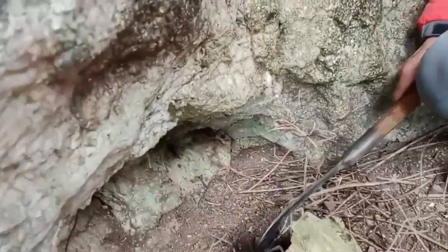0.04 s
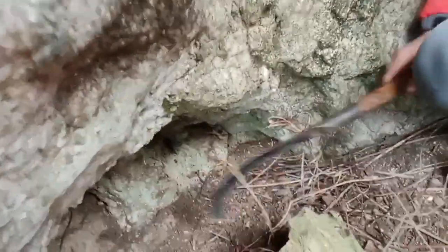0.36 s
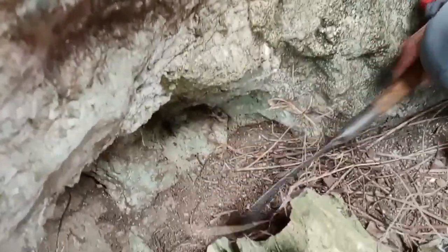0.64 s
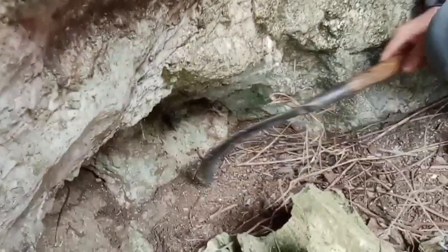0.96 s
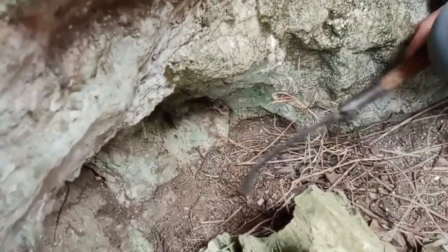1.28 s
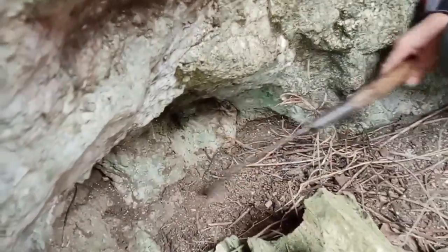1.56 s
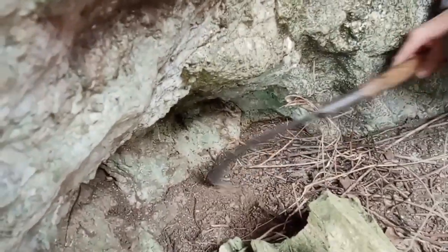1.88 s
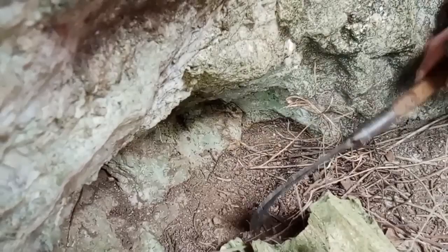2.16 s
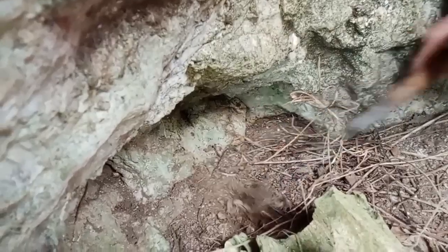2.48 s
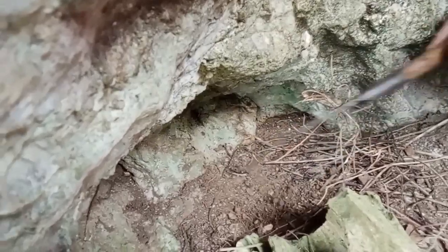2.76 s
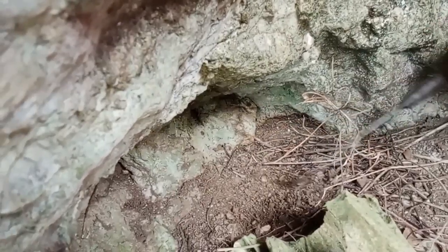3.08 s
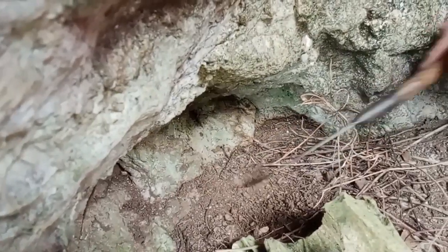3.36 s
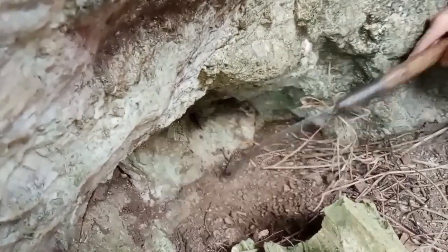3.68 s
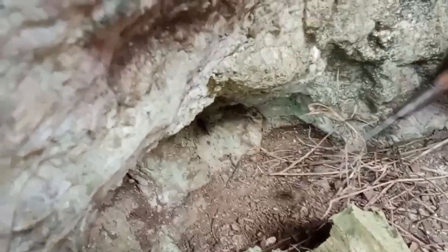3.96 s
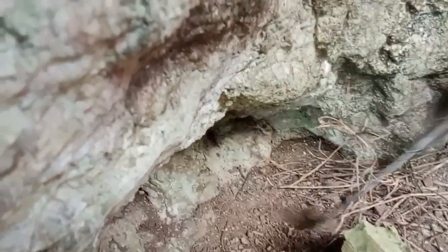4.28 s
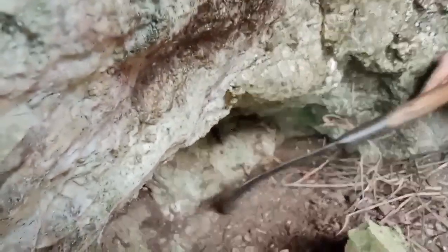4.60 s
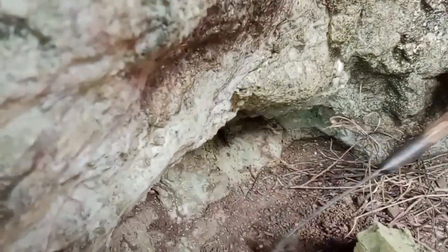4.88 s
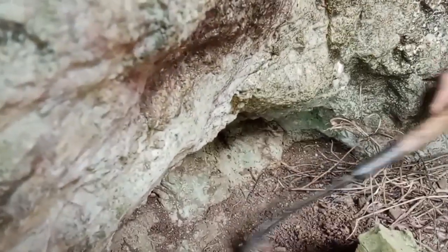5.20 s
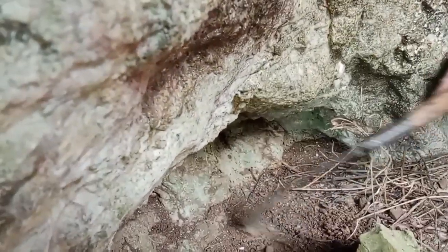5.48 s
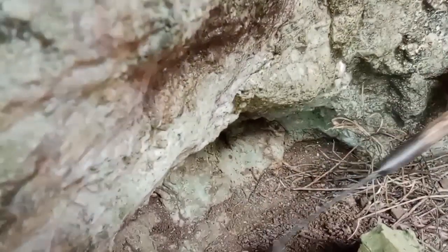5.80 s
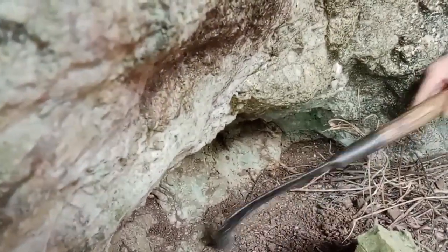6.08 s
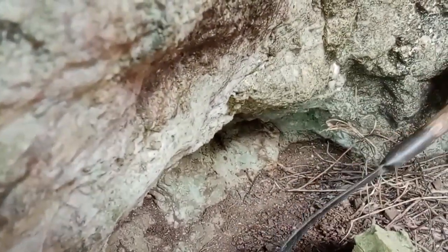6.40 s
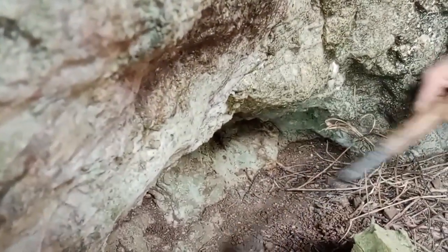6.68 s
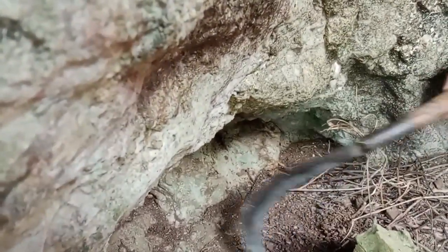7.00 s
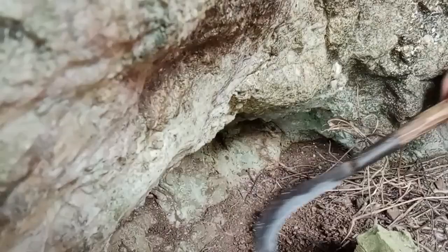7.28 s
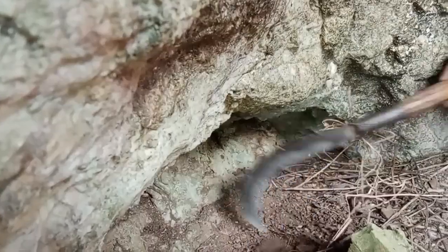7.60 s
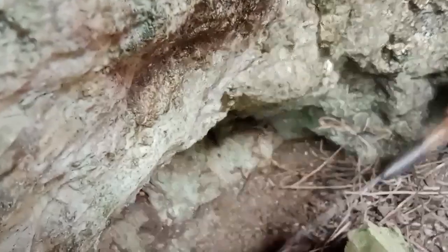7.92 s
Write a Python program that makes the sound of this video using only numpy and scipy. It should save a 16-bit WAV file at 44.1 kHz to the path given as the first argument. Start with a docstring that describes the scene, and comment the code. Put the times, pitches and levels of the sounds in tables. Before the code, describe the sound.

Close by, in a quiet outdoor rock hollow, a steel blade scrapes again and again through dirt and small stones. The quick, even strokes crunch and rasp, with short ringing clinks and dull knocks of packed earth. Dry twigs crack now and then, and loose grit settles faintly between strokes. Harder stone hits come midway and in the last seconds, each with a very short, tight echo.

```python
"""Digging at a rock wall

A long hooked steel blade digs in gritty soil, close by. Each stroke drags grit over the steel, which
rings briefly, and shoves earth aside; the edge strikes stones, dry twigs snap and crumbs trickle back.
The rock hollow answers quickly over quiet outdoor air."""
import sys
import numpy as np
from scipy import signal
from scipy.fft import rfft, irfft, next_fast_len
from scipy.io import wavfile
from scipy.ndimage import uniform_filter1d, map_coordinates

SR = 44100
rng = np.random.default_rng(int(sys.argv[2]) if len(sys.argv) > 2 else 0)


def materialize(psi):
    """Save the field psi as 16-bit PCM at rate SR to the path in sys.argv[1].

    A 1-D psi becomes a single channel; in a 2-D psi each row is a channel.
    """
    bounded = np.clip(np.atleast_2d(psi).T, -1, 1)
    quanta = np.round(bounded * 32767).astype(np.int16)
    wavfile.write(sys.argv[1], SR, quanta)


N = 355005
TIME_S, HIT_S = np.arange(N) / SR, np.arange(5120) / SR
FFT_SIZE, TOP_HZ = next_fast_len(N + SR // 2), 15000
TURN_S = 4.2  # blade turns from tip to flat side
BITE_S = .004  # half the time the edge takes to enter the soil


# Strokes: bite t/s, hardest t/s, let-go t/s, scrape at hardest/dB, bite and let-go re hardest/dB,
# fade/(dB/s), free ring, grit and earth re scrape/dB, favoured f/Hz, clod f/Hz
DIG_STROKES = [(0, 0.046, 0.19, -36, -10, -8, 170, -2, -1, -17.5, 2410, 598),
               (0.607, 0.702, .8, -40, -5.5, -4, 198, -1, -1, -15, 1960, 599),
               (1.109, 1.204, 1.301, -34, -11, -10.5, 281, -12, -4, -20, 1900, 674),
               (1.634, 1.69, 1.773, -31.5, -10, -4, 309, -10, -6, -23.5, 1610, 648),
               (2.042, 2.08, 2.203, -31, -2, -3.5, 233, 0.5, -3.5, -23, 2250, 699),
               (2.474, 2.554, 2.626, -34.5, -4, -4.5, 174, -14, -3, -21, 1997, 570),
               (2.91, 3.03, 3.115, -33, -8, -9.5, 395, -19, -4, -14, 1600, 320),
               (3.381, 3.48, 3.62, -35, 1, -13, 266, -27, -7, -15, 1600, 280),
               (3.819, 3.895, 3.937, -22, -17, -14, 208, -7, -6, -17.5, 1937, 259.3),
               (4.251, 4.327, 4.355, -23, -13, -15.5, 261.5, -7.5, -4.5, -15.5, 1960, 260.2),
               (4.801, 4.89, 5.013, -31.5, -12, -12.5, 207, -10, -6.5, -17, 1956, 260),
               (5.208, 5.25, 5.414, -37, -1.5, -3, 171, -8, -4.5, -16, 2290, 596),
               (5.614, 5.739, 5.9, -41, -2.5, 3, 375, -13, -.5, -11, 1200, 202.6),
               (6.237, 6.323, 6.394, -35.5, -6, -1, 230.5, -11, -3, -14.5, 2296, 188.6),
               (6.75, 6.791, 6.85, -35.5, -4.5, -3, 200, -3, -3, -18, 2300, 595),
               (7.243, 7.329, 7.475, -39.5, -0.5, -3.5, 145, -8, 0, -12.5, 2000, 440),
               (7.855, 7.91, 8, -36, -4, -6.5, 241, -0.5, -1, -15, 2000, 186.6)]
# Grazes between strokes: centre t/s, half-length/s, scrape/dB, free ring, grit and earth re scrape/dB
SURFACE_GRAZES = [(0.305, 0.037, -52, -8, 6, -13), (0.41, 0.053, -53.5, 1, 15, -13),
                  (1.602, 0.016, -43, -12, -1, -23), (1.888, 0.024, -50.5, 4, 4, -30),
                  (2.332, 0.023, -49, 2, -3.5, -38), (4.173, 0.094, -68, 0, 6.5, -4),
                  (4.466, 0.037, -67.5, 3, 5.5, -26), (4.772, .018, -45, 0, -4, -28.5),
                  (5.043, 0.018, -48, -4, -9, -9.5), (6.22, 0.024, -52, -26.5, -2, 0),
                  (6.481, 0.013, -53, 4.5, -7, -8), (6.725, 0.032, -58.5, -14, -4, -6),
                  (7.48, .02, -44.5, -10, 7, 0), (7.622, 0.038, -57, -6, 6, -19)]

def stroke_gains():
    """Scrape, free ring, grit and earth gains: strokes bite, push and slide out; grazes swell and fade."""
    slide_db, leave_s = 29.5, .035  # fade until the blade is out, then decay time constant
    bite_ring_db, bite_ring_s = 11, .03  # steel rings more freely until the soil grips it
    fade_ratios = np.array([1, .93, .9, .85])[:, None]
    gains = np.zeros((4, N))
    for bite, hardest, let_go, db, bite_db, let_go_db, fade_db_per_s, *shares_db, _, _ in DIG_STROKES:
        near = (TIME_S > bite - BITE_S) & (TIME_S < let_go + .5)
        t = TIME_S[near]
        push_db = db + np.interp(t, [bite, hardest, let_go], [bite_db, 0, let_go_db])
        sliding_s = np.maximum(t - let_go, 0)
        entering = np.clip((t - bite + BITE_S) / (2 * BITE_S), 0, 1) ** 2
        leaving = np.exp(-np.maximum(sliding_s - slide_db / fade_db_per_s, 0) / leave_s)
        levels_db = push_db + np.array([0, *shares_db])[:, None] - fade_ratios * fade_db_per_s * sliding_s
        levels_db[1] += bite_ring_db * np.exp(-(t - bite) / bite_ring_s)
        gains[:, near] += entering * leaving * amp(levels_db)
    for s, half_s, db, *shares_db in SURFACE_GRAZES:
        near = np.abs(TIME_S - s) < half_s * np.pi
        swell = np.exp(-((TIME_S[near] - s) / half_s) ** 2)
        gains[:, near] += amp(db + np.array([0, *shares_db]))[:, None] * swell
    return gains


def favoured_pitch():
    """Pitch favoured by the part of the edge in the soil, per sample."""
    bites, *_, hz, _ = np.transpose(DIG_STROKES)
    return hz[np.maximum(np.searchsorted(bites - BITE_S, TIME_S) - 1, 0)]


# Blade modes, damped by soil and hand: f/Hz, base width/Hz, tip level/dB, flat-side level/dB
BLADE_MODES = [(857.5, 47, -16.5, -33), (1035, 160, -7, -13), (1110, 100, -12, -5.5), (1515, 100, -2, -2.5),
               (1656, 64, -8, -9), (1886, 120, 0, 4.5), (1990, 119, 4.5, 1.5), (2133, 53, -5, -24.5),
               (2280, 115, -10.5, 2.5), (2486, 130, -14.5, -4.5), (2910, 46, -16, -12),
               (2900, 87, -14, -28), (3134, 71, -14, -8), (3890, 120, -16.5, -16.5), (3986, 90, -13, -16.5),
               (4160, 36, -19, -16.5), (4950, 60, -22, -31), (5014, 120, -18, -18.5),
               (5840, 84, -23, -26.5), (6232, 70, -19, -23), (6860, 80, -20.5, -26),
               (7410, 120, -23, -27.5), (8230, 120, -27.5, -34.5), (9290, 240, -32.5, -38)]
# Spectra of edge crunch, loose grit and shoved earth: f/Hz, level/dB
CRUNCH_SPECTRUM = [(150, -38), (400, -27.5), (700, -12.5), (1100, 0), (1700, 6), (2400, -0.5), (3200, -12),
                   (6000, -30), (14000, -63.5)]
GRIT_SPECTRUM = [(500, -31.5), (1800, -6.5), (2600, 4), (4000, 2.5), (5500, -3), (7500, -11.5), (9000, -19),
                 (10300, -24.5), (11400, -20.5), (12600, -35), (13600, -29), (15000, -51.5)]
EARTH_SPECTRUM = [(30, -24.5), (90, -13.5), (200, -4), (330, -7.5), (480, -2), (620, 3), (780, 1),
                  (1300, -17.5), (4000, -60.5)]

def scraping(scrape, free, loose, shove):
    """Grit catches and slips on the edge, ringing the steel; soil crumbles ahead of it."""
    free_hz, favour_db, favour_oct = 2259, 2, .13
    slips = unit(amp(1.94 * wobble(120)))
    force = slips * grains(per_s=1400, spread_db=4.5)
    low, high = np.zeros((2, N))
    turned, favoured_hz = TIME_S > TURN_S, favoured_pitch()
    for k, (hz, width_hz, tip_db, side_db) in enumerate(BLADE_MODES):
        octaves = np.log2(hz / favoured_hz)
        distance_oct = np.minimum(np.abs(octaves), np.abs(octaves - 1))
        lift_db = favour_db * np.exp(-(distance_oct / favour_oct) ** 2)
        travel_db = 4.94 * wobble(12)  # contact point moves along the edge
        strength = amp(np.where(turned, side_db, tip_db) + lift_db + travel_db)
        band = low if hz < 2700 else high
        band += (-1) ** k * strength * ring(force, [(hz, width_hz * .8, 0)])
    steel = amp(3) * unit(low + amp(-17) * high) + amp(-5.5) * unit(coloured(force, CRUNCH_SPECTRUM))
    singing = amp(-3) * unit(ring(ring(force, [(free_hz, 40, 0)]), [(free_hz, 600, 0)]))
    fine = amp(5.5) * slips * grains(per_s=7600, spread_db=5)
    coarse = amp(-.5) * grains(per_s=260, spread_db=4)
    crackle = unit(coloured(amp(-12.5) * force + fine + coarse, GRIT_SPECTRUM))
    clinks = amp(4) * unit(high)
    grit = amp(-6.5) * (crackle + clinks)
    earth = unit(coloured(slips * grains(per_s=900, spread_db=2.5), EARTH_SPECTRUM))
    return scrape * steel + free * singing + loose * grit + shove * earth


# Stone strikes: t/s, nominal peak/dB, knock/dB, sharpness/dB, low ring f/Hz, high ring f/Hz, contact t60/s
STONE_STRIKES = [(.044, -15.5, -47, -25, 2280, 2960, 0.03), (.616, -28, -33, -12, 2295, 2880, 0.032),
                 (.68, -17, -31, -12.5, 1890, 2970, 0.033), (.726, -18, -50, -25, 1920, 3860, 0.037),
                 (1.168, -23.5, -47, -15, 1930, 4000, 0.043), (1.198, -20, -44, -13, 1850, 3930, .065),
                 (1.645, -22, -44, -13.5, 1975, 2750, .04), (1.678, -19.5, -47, -12.5, 1930, 2880, 0.034),
                 (2.044, -19, -39, -6, 2300, 5120, 0.013), (2.09, -17, -41, -16, 1875, 2920, .04),
                 (2.16, -13, -43, -14, 1950, 6236, 0.025), (2.478, -21, -45, -11, 2280, 4110, 0.04),
                 (2.526, -19.5, -42, -13, 2040, 2900, 0.024), (2.911, -26.5, -42, -15, 1960, 3150, .025),
                 (3.036, -14.5, -25, -18, 1926, 3800, 0.035), (3.456, -16, -35, -27, 1880, 3090, 0.022),
                 (3.48, -15.5, -50, -20.5, 2290, 3040, .041), (3.825, -21.5, -37, -7, 1960, 3130, .028),
                 (3.881, -14, -20, -15, 2300, 3410, 0.025), (3.893, -6.5, -34, -21, 1952, 3020, 0.044),
                 (4.255, -16.5, -39, -7, 1970, 3100, .028), (4.283, -15, -25.5, -19.5, 1830, 3120, .033),
                 (4.316, -8, -31, -24, 1936, 3430, .05), (4.324, -7.5, -21.5, -14, 1960, 3952, .03),
                 (4.754, -34, -45, -18, 2280, 3120, .025), (4.827, -20.5, -38, -20, 2470, 3120, .025),
                 (4.848, -18, -26, -21, 2030, 2980, 0.036), (4.866, -18.5, -22, -14, 1950, 4021, 0.036),
                 (4.895, -10.5, -32, -17.5, 2114, 2940, .014), (4.932, -18, -26, -11.5, 2350, 4100, 0.047),
                 (5.024, -31, -28, -10, 2000, 5100, 0.04), (5.35, -22.5, -23, -5, 2350, 5020, 0.02),
                 (5.619, -11.5, -59, -10, 2310, 3846, 0.041), (5.641, -13, -50, -2.5, 2110, 3310, 0.049),
                 (5.664, -17.5, -37, -9, 2285, 3070, 0.031), (5.685, -7.5, -46, -11.5, 2280, 3800, 0.074),
                 (6.417, -4.5, -21.5, -11.5, 1974, 3587, .014), (6.422, -11.5, -24, 10, 2280, 4600, .034),
                 (6.762, -4.5, -31, -16, 1920, 3140, .018), (7.36, -18.5, -46, -8.5, 2215, 2760, 0.022),
                 (7.858, -1.5, -21, -18, 2280, 2893, 0.041), (7.901, -15, -29, -17, 2340, 3140, .04),
                 (7.992, -27.5, -40, -10.5, 1990, 3900, .031)]
# Ground knock spectrum: f/Hz, level/dB
KNOCK_SPECTRUM = [(40, -40.5), (120, -20.5), (200, -6), (300, -18), (450, -3.5), (600, 0.5), (800, -17),
                  (1150, 6), (1600, -10), (3000, -22), (9000, -62)]

def stones(strikes):
    """Each stone rings the blade at new strengths, cracks, thuds in the ground and bends the blade."""
    width_ratio, rise_per_t60, crest_db = .72, .08, 8
    track = np.zeros(N)
    for s, peak_db, knock_db, sharp_db, low_hz, high_hz, t60_s in strikes:
        contact = burst(rise_s=.0011, t60_s=t60_s)
        held = [(hz, width, tip if s < TURN_S else side) for hz, width, tip, side in BLADE_MODES]
        favoured = [(low_hz, 70, 3), (high_hz, 55, sharp_db + 11.5)]  # set by the contact point
        hz, width_hz, mode_db = np.transpose(held + favoured)[:, :, None]
        strength = amp(mode_db + rng.normal(0, 4.5, hz.shape))
        decay = np.exp(-np.pi * width_hz * width_ratio * HIT_S)
        phase = 2 * np.pi * hz * HIT_S + rng.uniform(0, 2 * np.pi, hz.shape)
        swell = 1 - np.exp(-HIT_S / (rise_per_t60 * t60_s))
        steel = unit((strength * decay * np.sin(phase)).sum(0) * swell)
        crunch = amp(-12.5) * unit(coloured(contact, CRUNCH_SPECTRUM))
        crack = amp(sharp_db + 4.5) * unit(coloured(contact, GRIT_SPECTRUM))
        thud = unit(coloured(burst(rise_s=.0015, t60_s=.021), KNOCK_SPECTRUM))
        bend = amp(-11.5) * unit(ring(burst(rise_s=.00078, t60_s=.017), [(635, 58, 0)]))
        knock = amp(knock_db + 12) * (thud + bend)
        add(track, s - .0015, steel + crunch + crack + knock, peak_db - crest_db, window=400)
    return track


def pebbles(scrape):
    """Small stones strike the edge at random, louder the harder the blade pushes."""
    per_s, firm_push_db, firm_peak_db, growth = 20, -32, -23.5, 1.25
    knock_db, sharp_db, t60_s = -34, -13.5, .032
    level_db = firm_peak_db + growth * (20 * np.log10(scrape + 1e-9) - firm_push_db)
    strikes = []
    for when, size, low, high in rng.random((int(per_s * N / SR), 4)):
        peak_db = level_db[int(when * N)] + 4.5 * (2 * size - 1)
        low_hz, high_hz = 2066 * 2 ** (.45 * (low - .5)), 3720 * 2 ** (.8 * (high - .5))
        strikes.append((when * N / SR, peak_db, knock_db, sharp_db, low_hz, high_hz, t60_s))
    return stones(strikes)


def clods(shove):
    """Packed earth gives way at the hardest push: a dull crunch, lower as the soil gets deeper."""
    half_s, fall_oct_per_s = .07, 7
    track = np.zeros(N)
    for _, hardest, *_, hz in DIG_STROKES:
        near = np.abs(TIME_S - hardest) < 2 * half_s
        t = TIME_S[near] - hardest
        swell = np.exp(-(t / half_s) ** 4 / 2)
        track[near] += swell * noise_band(hz * 2 ** (-fall_oct_per_s * t), width_ratio=1.1)
    return amp(-4) * shove * track


# Lumps knocked over: t/s, peak/dB, f/Hz, t60/s
EARTH_LUMPS = [(3.01, -32.5, 332, .14), (3.095, -42, 150, .09), (3.382, -23.5, 1140, 0.064),
               (4.33, -33, 165, .08), (5.445, -33, 1300, 0.095), (5.655, -41.5, 190, .1),
               (5.728, -30, 950, .07), (5.745, -34, 620, 0.038), (6.33, -43, 135, .14),
               (6.418, -28, 616, .05), (7.322, -35, 520.3, 0.12), (7.857, -16, 570, 0.041),
               (7.859, -32, 195, .08)]

def lumps():
    """Lumps of packed earth knock dully, with one broad resonance."""
    track = np.zeros(N)
    for s, db, hz, t60_s in EARTH_LUMPS:
        body = [(hz, hz * .51, 0)]
        contact = burst(rise_s=.0015, t60_s=t60_s)
        add(track, s - .001, ring(ring(contact, body), body), db)
    return track


# Dry twigs: t/s, peak/dB, f/Hz
TWIG_SNAPS = [(0.5412, -46, 1500), (1.477, -33, 2330), (3.7297, -35, 1940), (3.7345, -21, 3580),
              (4.481, -40.5, 2230), (4.5181, -32.5, 6600), (5.1627, -34, 1720), (6.98, -42.5, 2430),
              (7.0495, -39, 3300), (7.055, -26, 3600), (7.2004, -37, 4990)]
# Taps on thicker wood: t/s, peak/dB
WOOD_TAPS = [(1.433, -22)]
# Tap spectrum: f/Hz, level/dB
WOOD_SPECTRUM = [(50, -43), (200, -4), (370, 0), (650, -17), (900, -16), (1300, 0), (1900, 2.5),
                 (2900, -10.5), (4500, -30), (12000, -55)]

def twigs():
    """Thin sticks break with a click and a short pitched rattle; thicker wood gives a tap and a thud."""
    track = np.zeros(N)
    click = signal.unit_impulse(len(HIT_S))
    for s, db, hz in TWIG_SNAPS:
        snap = ring(click + amp(-14.5) * burst(rise_s=.0015, t60_s=.022), [(hz, 900, 0)])
        stick_modes = [(hz * .5, 250, -1), (hz * .84, 200, -9), (hz, 380, 0),
                       (hz * 1.29, 300, -7), (hz * 1.67, 500, -9)]
        add(track, s - .0005, ring(snap, stick_modes), db)
    for s, db in WOOD_TAPS:
        add(track, s - .0003, coloured(click, WOOD_SPECTRUM), db)
    return track


# Treble crackle spectrum: f/Hz, level/dB
TREBLE_CRACKLE_SPECTRUM = [(4000, -25), (8000, -6), (10500, 0), (12000, -2), (13000, -8), (15000, -18)]

def treble_crackle(loose):
    """Faint high crackle follows the grit and fades steadily over time."""
    loss_db_per_s = 3.5
    level_db = -26 - loss_db_per_s * TIME_S + 3 * wobble(60)
    crackle = unit(coloured(grains(per_s=900, spread_db=5), TREBLE_CRACKLE_SPECTRUM))
    return loose * amp(level_db) * crackle


def crumbs():
    """Loose soil trickles back softly after each stroke and settles."""
    lag_s, settle_s = .14, .1
    distances_s = [np.where(TIME_S > bite, np.abs(TIME_S - let_go - lag_s), np.inf)
                   for bite, _, let_go, *_ in DIG_STROKES]
    gain = amp(-70 + 3 * wobble(3.9)) * np.exp(-np.min(distances_s, axis=0) / settle_s)
    return gain * unit(coloured(grains(per_s=600, spread_db=3), GRIT_SPECTRUM))


# Decay of the rock hollow: f/Hz, t60/s
HOLLOW_DECAY = [(150, 0.13), (1000, 0.1), (4000, 0.044), (12000, 0.091)]

def hollow(x):
    """Dense, quick reflections from the rock around the hole."""
    hz, t, noise = signal.stft(rng.standard_normal(SR // 4), SR, nperseg=128)
    decay = amp(-60 * t / along(HOLLOW_DECAY, hz)[:, None])
    tail = signal.istft(noise * decay, SR, nperseg=128)[1]
    delayed = np.pad(tail / np.linalg.norm(tail), (SR // 400, 0))
    return signal.fftconvolve(x, delayed)[:N]


# Outdoor air spectrum: f/Hz, level/dB
AIR_SPECTRUM = [(15, -43.5), (25, -18.5), (103, -3), (264, -10.5), (344, -8), (655, -12.5), (879, -12.5),
                (1060, -11.5), (2560, -15.5), (3010, -20), (6720, -32.5), (7890, -29.5), (9520, -51.5),
                (15000, -47)]
# Far drone: t/s, f/Hz, level/dB
FAR_DRONE = [(0, 417.6, -91), (0.599, 393.4, -60), (1.102, 368, -73.5), (2, 343, -73), (3, 330, -73.5),
             (4, 333, -86)]

def air():
    """Quiet outdoor air, a far drone at first and an uneven low rumble toward the end."""
    hush = amp(-63 + 1.3 * wobble(7)) * unit(coloured(rng.standard_normal(N), AIR_SPECTRUM))
    rumble_db = np.interp(TIME_S, [0, 5.8, 6.5, 8], [-85, -69.5, -63, -62]) + 2.5 * wobble(24)
    rumble = amp(rumble_db) * noise_band(np.full(N, 113), width_ratio=.34)
    s, hz, db = np.transpose(FAR_DRONE)
    drone = amp(np.interp(TIME_S, s, db)) * noise_band(np.interp(TIME_S, s, hz), width_ratio=.12)
    return hush + rumble + drone


def amp(db):
    """Decibels to gain."""
    return 10 ** (np.asarray(db) / 20)


def unit(x):
    """Scale to rms 1."""
    return x / np.sqrt(np.mean(x ** 2) + 1e-20)


def along(points, hz):
    """Interpolate (f/Hz, value) points on a log axis."""
    f, values = np.transpose(points)
    return np.interp(np.log(hz + 1), np.log(f), values)


def wobble(knots_per_s):
    """Smooth random curve."""
    knots = rng.standard_normal(int(N * knots_per_s / SR) + 4)
    steps = np.arange(len(knots) * 8) / 8
    return np.interp(TIME_S * knots_per_s, steps, map_coordinates(knots, [steps], order=2))


def coloured(x, spectrum):
    """Minimum-phase filter through (f/Hz, level/dB) points."""
    size = FFT_SIZE if len(x) == N else len(x)
    gain = amp(along(spectrum, np.fft.rfftfreq(size, 1 / SR)))
    cepstrum = irfft(np.log(gain), size)
    cepstrum[1:size // 2] *= 2
    cepstrum[size // 2 + 1:] = 0
    return irfft(rfft(x, size) * np.exp(rfft(cepstrum)), size)[:len(x)]


def ring(x, modes):
    """Drive (f/Hz, width/Hz, level/dB) resonances of alternating sign."""
    return sum((-1) ** k * amp(db) * signal.lfilter(*signal.iirpeak(hz, hz / width_hz, SR), x)
               for k, (hz, width_hz, db) in enumerate(modes))


def grains(per_s, spread_db):
    """Random tiny impacts of uneven size."""
    hits = (rng.random(N) < per_s / SR) * rng.choice([-1, 1], N)
    return unit(hits * amp(spread_db * np.clip(rng.standard_normal(N), -2, 2)))


def burst(rise_s, t60_s):
    """Contact noise: a quick cluster of tiny fractures."""
    return rng.standard_normal(len(HIT_S)) * (1 - np.exp(-HIT_S / rise_s)) * amp(-60 * HIT_S / t60_s)


def noise_band(hz, width_ratio):
    """Noise of rms 1 around a moving frequency."""
    cycles = np.cumsum(hz) / SR
    knots = rng.standard_normal((2, 4096))
    i, q = (map_coordinates(k, [cycles * width_ratio], order=2, mode="wrap") for k in knots)
    return unit(i * np.cos(2 * np.pi * cycles) + q * np.sin(2 * np.pi * cycles))


def add(track, s, sound, db, window=1):
    """Mix in at time s; db is the highest rms over `window` samples."""
    highest_rms = np.sqrt(uniform_filter1d(sound ** 2, window).max())
    part = track[max(round(s * SR), 0):][:len(sound)]
    part += (amp(db) * sound / highest_rms)[:len(part)]


def scene():
    """Digging, its echo and the air, in mono."""
    scrape, free, loose, shove = stroke_gains()
    digging = scraping(scrape, free, loose, shove) + treble_crackle(loose) + clods(shove)
    digging += lumps() + stones(STONE_STRIKES) + twigs() + crumbs()
    background = air()
    digging += pebbles(scrape)
    return (digging + amp(-7.5) * hollow(digging) + background)[None]


# Treble response: f/Hz, level/dB
TREBLE_RESPONSE = [(8800, -1.5), (10000, -8.5), (11300, -2), (12600, -12), (13500, 0), (14600, -24.5)]

def record(dry):
    """Colour the treble, round the highest peaks, cut above TOP_HZ."""
    ceiling = .84
    heard = coloured(dry[0], TREBLE_RESPONSE)
    rounded = heard / (1 + np.abs(heard / ceiling) ** 6) ** (1 / 6)
    passband = np.fft.rfftfreq(FFT_SIZE, 1 / SR) < TOP_HZ
    return irfft(rfft(rounded, FFT_SIZE) * passband, FFT_SIZE)[None, :N]


dry = scene()
out = record(dry)
materialize(out)
```